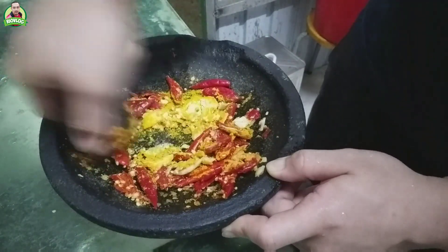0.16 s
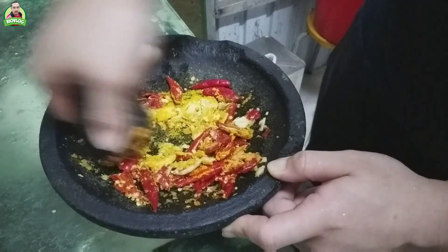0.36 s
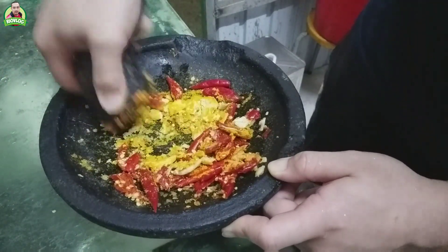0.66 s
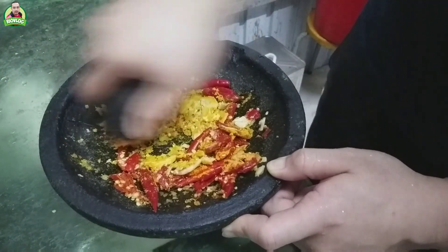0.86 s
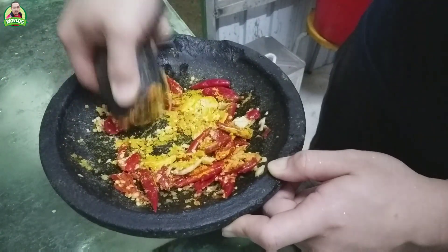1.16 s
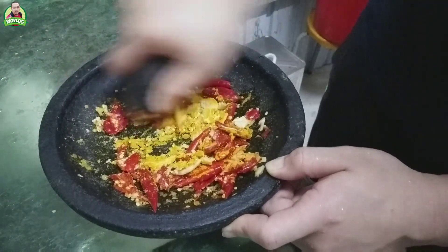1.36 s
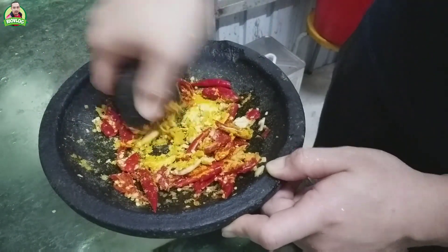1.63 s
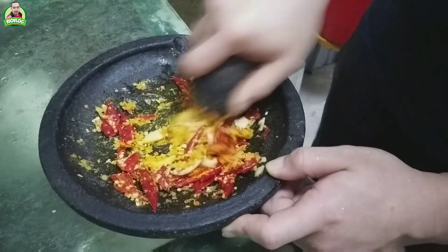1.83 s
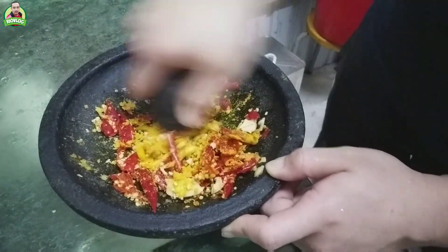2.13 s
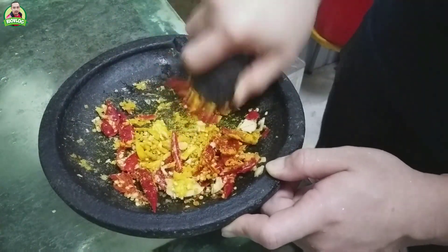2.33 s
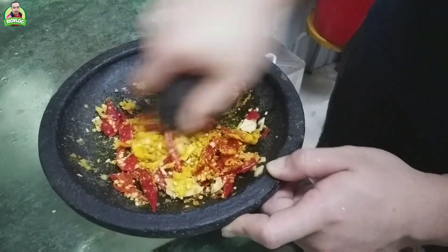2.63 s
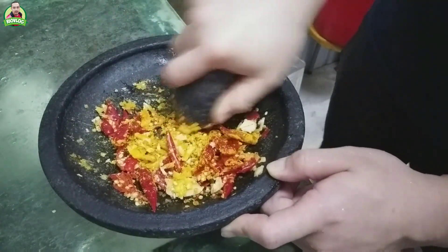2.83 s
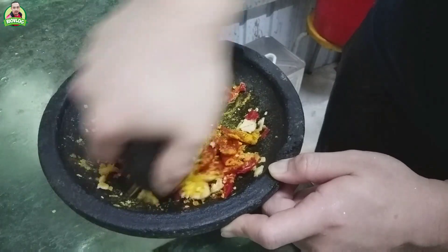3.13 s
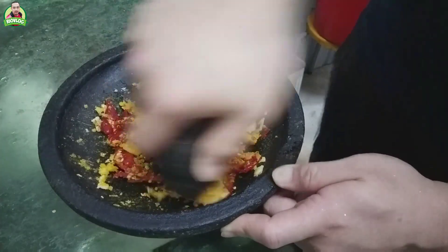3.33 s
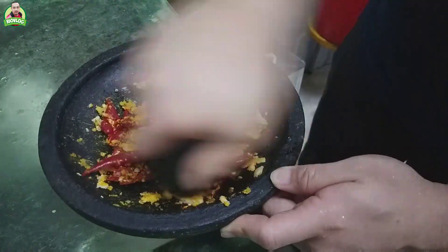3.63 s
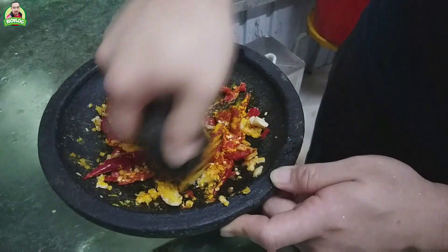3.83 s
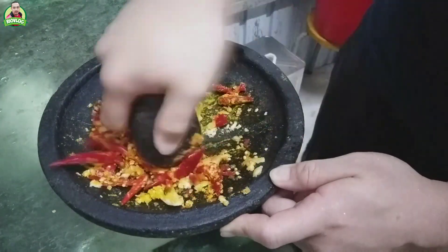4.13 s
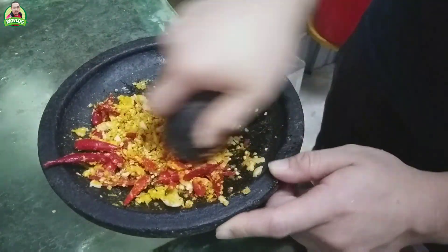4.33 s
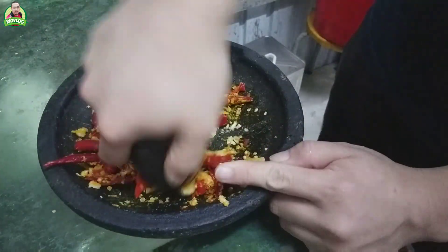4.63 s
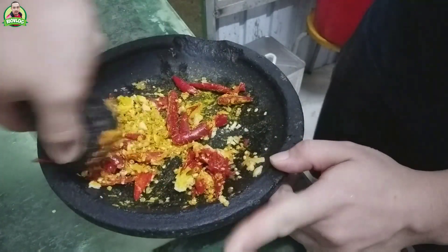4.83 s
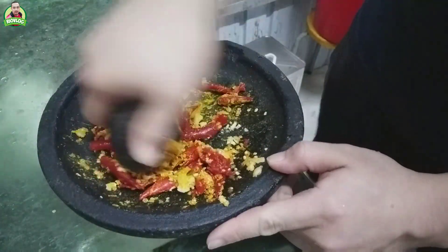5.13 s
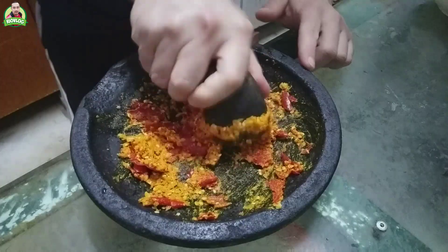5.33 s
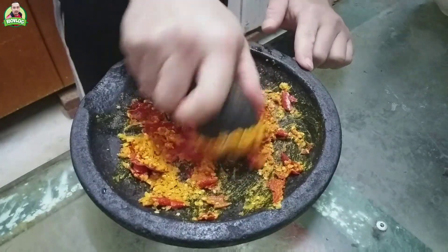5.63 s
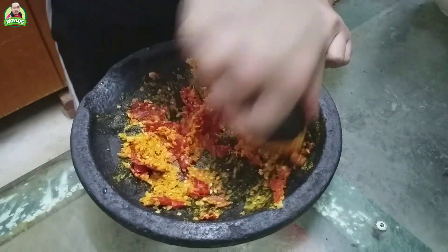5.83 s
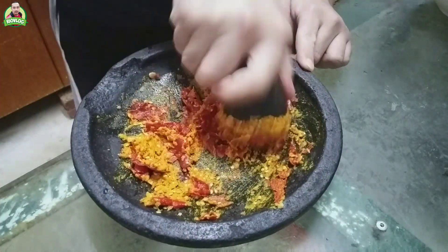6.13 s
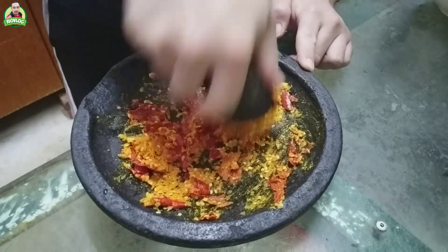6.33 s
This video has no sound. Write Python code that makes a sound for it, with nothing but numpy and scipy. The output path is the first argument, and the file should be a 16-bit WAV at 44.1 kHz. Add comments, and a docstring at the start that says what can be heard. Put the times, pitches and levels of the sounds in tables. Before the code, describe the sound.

Close by in a small tiled kitchen, a stone pestle grinds spices in a heavy stone mortar. A hard double knock at about 0.2 seconds rings the bowl around a middle pitch and thumps its base. Gentle, rumbling strokes follow, with gritty crackle, faint taps and tiny squeaks near 0.5 and 1.1. Around 1.9 to 2.2 a dense burst of seeds snaps sharply, with more at 2.45. Three quick stony scrapes come at 2.6, a duller thud at 3.1, and a rough, rumbling cluster at 3.5. Loud ringing knocks strike at 4.05, with a quick rebound, and at 4.6. Grinding quietens towards 5.3. At 5.36 the sound drops out for about a hundredth of a second, then grinding resumes brighter and closer, in short, low-bodied strokes, until 6.5. Short hard reflections follow the blows; faint kitchen air and thin steady tones lie underneath.

```python
"""A stone pestle in a flat stone mortar on a hard kitchen floor, heard from close by in a small tiled room.
A hard double knock rings the bowl; light taps, rumbling strokes and a burst of snapping seeds at 2 s follow.
Harder knocks come near 3.1, 4.05 and 4.6 s; the sound drops out near 5.36 s, then brighter, closer grinding ends it.
Blows and scrapes ring sets of dying modes, strokes drive random grit, snaps and squeaks are short noises.
Sparse reflections make the room; shaped noise and faint tones make the kitchen air."""
import sys
import numpy as np
from scipy import signal
from scipy.fft import rfft, irfft
from scipy.io import wavfile
from scipy.ndimage import uniform_filter1d

SR = 44100
rng = np.random.default_rng(int(sys.argv[2]) if len(sys.argv) > 2 else 0)


def bounce(signal):
    """Save signal as a 16-bit WAV file at the path given by the first command-line argument."""
    frames = np.transpose(np.atleast_2d(signal))
    limited = np.clip(frames, -1, 1)
    pcm = np.round(limited * 32767).astype(np.int16)
    wavfile.write(sys.argv[1], SR, pcm)


N = 285768
TIME = np.arange(N) / SR  # s
FLOOR_HZ = 120  # the deepest note of the floor under the mortar
# The short silence. Its start and its end in seconds.
GAP = (5.354, 5.366)


# Blows and rebounds of the pestle, and short stony scrapes near 2.6 s. Each row: start in seconds, bowl ring in
# dB, pitch favoured by the contact spot in Hz, floor thump in dB, thump pitch in Hz, base knock in dB, crack in
# dB, chatter's 60 dB decay in seconds, damping of the bowl as a factor on its decay rate.
BLOWS = [(0.186, -5, 1660, -13.5, 217, -4.5, -15.5, 0.12, 3.1),
         (0.2092, -6, 1600, -24, 166, -23, -25, 0.11, 1.3),
         (0.4767, -44, 1820, -29, 219, -30, -49.5, 0.035, 1.2),
         (1.0435, -50, 1590, -40, 170, -36, -34.5, 0.027, 1.4),
         (1.3152, -59, 1580, -22, 132, -50, -42.5, 0.14, 1.4),
         (1.548, -46, 1600, -42, 186, -32, -43, 0.082, 1.4),
         (2.1152, -42, 1700, -34, 216, -36, -30, 0.017, 1.4),
         (2.602, -32.5, 1500, -35, 240, -51, -51, 0.065, 2.2),
         (2.6312, -30, 1920, -29, 266, -29, -36, 0.067, 2.8),
         (2.659, -29, 1780, -35, 257, -26.5, -40, 0.09, 2.2),
         (2.8, -50, 1600, -32.5, 201, -44, -46, 0.04, 1.9),
         (3.1245, -31, 1560, -13.5, 196, -9, -20, 0.096, 1.8),
         (3.4732, -33, 1820, -22, 228, -19.5, -37, 0.14, 3.1),
         (3.5367, -27, 1660, -42, 145, -17.5, -38, 0.065, 1.5),
         (3.5459, -21.5, 1820, -19, 130, -35, -27, 0.055, 2.5),
         (3.5767, -37, 1610, -26, 255, -24, -35, 0.082, 2),
         (4.0506, -3.5, 1667, -17, 267, -13.5, -17.5, 0.29, 3.2),
         (4.0788, -12, 1590, -18, 265, -10.5, -20, 0.04, 2.1),
         (4.586, -7.5, 1690, -20.5, 257, -7, -12.5, 0.056, 2.92),
         (5.8948, -59, 1604, -30, 125, -47, -52, 0.17, 1.4)]
# Modes of the stone bowl. Each row: pitch in Hz, relative level in dB, undamped 60 dB decay in seconds.
BOWL_MODES = [(1485, -5, .05), (1540, -6, .06), (1602, -1, .085), (1630, -2, .075), (1760, -5, .045),
              (1890, -7, .04), (2050, -10, .03), (2300, -11, .03), (2600, -13, .025), (3135, -15, .04),
              (3310, -16, .04)]
# Modes of the mortar's base. Each row: pitch in Hz, relative level in dB, undamped 60 dB decay in seconds.
BASE_MODES = [(251.2, -1, 0.11), (350, -4.5, 0.14), (407.2, 2.5, 0.074), (474, -1.5, 0.087),
              (532.5, 5, 0.044), (638, -5, 0.086), (700, -7.5, 0.065), (819, -5.5, 0.042), (910, -9, 0.034),
              (1022, -14.5, 0.13), (1119, -21, 0.26), (1393, -15.5, 0.019)]
# Spectrum of the crack at contact. Each row: frequency in Hz, relative level in dB.
CRACK_SPECTRUM = [(300, -20), (700, 8.5), (1500, 1.5), (2600, -3), (4000, -7), (5500, -12), (7600, -16),
                  (9600, -36.5), (16000, -53.5)]


def blows():
    """Each blow or scrape is a push and a dying chatter; base and floor answer just after the bowl rings."""
    out = np.zeros(N)
    t = np.arange(SR // 3) / SR
    base = ringing(BASE_MODES)
    crack = colour(CRACK_SPECTRUM)
    bowl_hz = np.array(BOWL_MODES)[:, :1]
    for s, ring_db, spot_hz, thump_db, thump_hz, knock_db, crack_db, t60, damping in BLOWS:
        chatter, splinter = gain_of(-60 * t / t60) * rng.standard_normal((2, len(t)))
        drive = gain_of(-32) * chatter  # the pestle's rattle, against a push of 1
        drive[0] += 1
        # modes near the spot's own pitch speak louder
        spot_db = 6 * np.exp(-((bowl_hz - spot_hz) / 120) ** 2)
        bowl = ringing(BOWL_MODES, damping, spot_db)
        floor = ringing([(thump_hz, 0, .1), (FLOOR_HZ, -5, .14), (1.37 * thump_hz, -6, .08)])
        splinter = splinter * (1 + 0.19 * np.exp(-t / 0.00043))  # slightly stronger at first contact
        add(out, s, gain_of(ring_db) * through(drive, bowl / bowl.max()))
        add(out, s + 0.002764, gain_of(knock_db) * through(drive, base / base.max()))
        add(out, s + 0.00343, gain_of(thump_db) * through(drive, floor / floor.max()))
        add(out, s, gain_of(crack_db) * through(splinter, crack))
    return out


# Grinding strokes. Each row: peak in seconds, rise in seconds, fall in seconds (both before the layer's fade
# speed), then peak levels in dB of floor thrum, base rumble, stone on stone, spice crackle.
STROKES = [(0.01, .15, 0.13, -47.5, -44.5, -48.5, -47), (0.319, 0.15, 0.1, -36, -43, -50, -37),
           (0.479, 0.0155, 0.19, -42.5, -39.5, -48, -52), (0.58, 0.16, 0.094, -55, -47, -50.5, -42.5),
           (0.81, 0.088, 0.105, -62, -74, -70, -46), (0.94, 0.11, 0.07, -42, -46.5, -52, -37),
           (1.041, 0.032, 0.17, -48.5, -45.5, -53, -48.5), (1.325, 0.0067, 0.032, -33.5, -45, -55, -42.5),
           (1.427, 0.095, 0.09, -40.5, -49, -46.5, -36.5), (1.585, .08, 0.16, -46.5, -45.5, -48, -40),
           (1.67, 0.11, 0.26, -51.5, -49.5, -49.5, -42), (1.904, 0.05, 0.12, -61, -55, -44.5, -33.5),
           (1.983, 0.06, .06, -42, -49, -46, -34), (2.084, 0.026, 0.069, -42, -57, -42, -27),
           (2.13, 0.042, 0.13, -41, -40, -54, -45), (2.19, 0.068, 0.076, -53, -49.5, -47, -31.5),
           (2.441, 0.089, .11, -39, -42.5, -41, -30), (2.611, 0.096, 0.18, -47, -39.5, -40.5, -41),
           (2.688, 0.087, 0.21, -39.5, -41, -46.5, -34), (2.945, 0.042, 0.098, -43, -47, -46.5, -43.5),
           (3.215, 0.11, .17, -39, -40.5, -42.5, -39.5), (3.478, 0.029, 0.031, -36, -38, -44, -40.5),
           (3.561, 0.032, 0.098, -26.5, -27, -38, -33), (3.74, 0.1, 0.14, -41.5, -41, -48.5, -37.5),
           (3.86, .1, 0.035, -43, -54, -63, -40.5), (4.16, 0.11, 0.053, -59, -32, -52, -33.5),
           (4.278, 0.15, 0.091, -48, -46.5, -54, -40), (4.685, 0.065, 0.099, -34.5, -40.5, -39.5, -40),
           (5.019, 0.05, 0.18, -47, -52, -54, -41.5), (5.371, 0.019, 0.093, -49, -47.5, -45, -39.5),
           (5.47, 0.081, 0.17, -43, -50, -46, -43.5), (5.535, 0.11, 0.12, -60, -48, -43, -48),
           (5.638, 0.046, 0.19, -40, -45.5, -50.5, -42.5), (5.77, .12, 0.062, -38.5, -49, -62, -47),
           (5.907, 0.02, 0.068, -27.5, -55.5, -48, -39.5), (5.98, 0.18, 0.1, -56, -45, -41, -46.5),
           (6.048, 0.11, 0.071, -38.5, -48.5, -51, -38), (6.187, 0.039, .09, -39, -68, -61, -37),
           (6.288, 0.1, 0.084, -38.5, -42.5, -49, -42), (6.462, 0.022, .1, -58, -48, -60, -41)]
# Levels between strokes, before leaning. In order: thrum, rumble, rasp, crackle, all in dB.
RESTING_DB = (-68, -61.5, -59, -78)
# Weight left on the pestle between strokes. Each row: time in seconds, dB added to the resting levels.
LEANING = [(0, 10), (.6, -1), (1.3, 0), (1.5, 9), (4.0, 9), (4.4, 1), (5.35, -6), (5.4, 4), (6.48, 8)]
# How fast each layer leaves a stroke's peak. In order: thrum, rumble, rasp, crackle, all as plain factors.
FADE_SPEED = (1.28, 1.16, .99, 1.29)


def stroke_levels():
    """Every stroke swells to its peak and fades; overlapping strokes add in power. Four levels in dB."""
    t = np.arange(0, N + 64, 64) / SR
    leaning_db = np.interp(t, *np.transpose(LEANING))
    power = gain_of(np.add.outer(RESTING_DB, leaning_db)) ** 2
    for peak, rise, fall, *level_db in STROKES:
        away = np.maximum((peak - t) / rise, (t - peak) / fall)
        away = away ** 1.15  # above 1 a stroke lingers near its peak and stops more suddenly
        drop_db = 15 * np.outer(FADE_SPEED, away)
        power = power + gain_of(np.array(level_db)[:, None] - drop_db) ** 2
    return (np.interp(TIME, t, 10 * np.log10(p)) for p in power)


# Stone rasping on stone. Each row: frequency in Hz, relative level in dB.
RASP_SPECTRUM = [(300, -25.5), (700, 21.5), (1200, 17), (2000, 12.5), (3200, 10.5), (5000, -7.5)]
# Added brighter rasp from the gap on, heard closer. Each row: frequency in Hz, relative level in dB.
CLOSE_RASP_SPECTRUM = [(1200, -17), (2200, -5.5), (3200, -0.5), (4500, -1), (7000, -28.5)]
# Breaking spice, shared with the snaps. Each row: frequency in Hz, relative level in dB.
CRACKLE_SPECTRUM = [(880, -57), (1500, -26), (1940, -18), (2230, -22), (2560, -15.5), (3000, -12.5),
                    (4160, -7), (5770, -8), (7610, -3.5), (9650, -24), (14300, -24), (16000, -26)]


def grinding():
    """Under the stroke grit shakes floor and base, rasps on the hand-damped bowl and crackles."""
    thrum_db, rumble_db, rasp_db, crackle_db = stroke_levels()
    bumps = evened(grit(300, 1.5, 1.2))

    # the floor note climbs 3.5 Hz per dB as the base is pressed harder
    thrum_hz = 184.6 + 3.5 * np.clip(rumble_db + 45.5, -12, 12)
    climbing = evened(resonate(resonate(bumps, thrum_hz, width_hz=123), thrum_hz, width_hz=113))
    deepest = evened(resonate(resonate(bumps, FLOOR_HZ, width_hz=48), FLOOR_HZ, width_hz=40))
    thrum = gain_of(thrum_db) * (climbing + gain_of(-6.0) * deepest)
    rumble = through(gain_of(rumble_db) * bumps, ringing(BASE_MODES, damping=1.84))

    stone = gain_of(rasp_db) * grit(400, 1.9, 0.91)
    rasp = gain_of(-5.0) * through(stone, colour(RASP_SPECTRUM))
    rasp = rasp + gain_of(-20.0) * through(stone, ringing(BOWL_MODES, damping=1.5))
    rasp = rasp + gain_of(-10.5) * (TIME > GAP[0]) * through(stone, colour(CLOSE_RASP_SPECTRUM))

    # grains break in clusters
    clumps = gain_of(1.8 * evened(uniform_filter1d(rng.standard_normal(N), 400)))
    grains = gain_of(crackle_db) * evened(clumps * grit(1200, 2.6, .9))
    # light strokes break only fine grains and sound thinner
    coarse = np.clip((crackle_db + 67.5) / 24, 0, 1)
    crackle = through(coarse * grains, colour(CRACKLE_SPECTRUM))
    crackle = crackle + through((1 - coarse) * grains, colour(tilted(CRACKLE_SPECTRUM, 7, 7000)))
    return thrum + rumble + rasp + crackle


# Seeds snapping, and a few short grinding clicks. Each row: start in seconds, level in dB, tilt below 7600 Hz
# in dB per octave.
SNAPS = [(0.2921, -9.5, 4), (0.817, -28, 17), (0.8615, -26, -2), (1.3945, -20.5, -7.5), (1.832, -24, 1),
         (1.91, -21, -8), (1.9622, -11, -4.5), (2.0746, -12.5, 0), (2.075, -5.5, -3), (2.098, -21, 5),
         (2.116, -9.5, 6), (2.149, -22, -9), (2.178, -13.5, 2.5), (2.426, -14, -3), (2.4407, -14.5, 0),
         (2.462, -12, 2), (2.592, -21, 27), (2.789, -24, 20), (2.955, -30.5, 24), (3.181, -23, 2),
         (3.264, -43, 16), (3.29, -32, 2), (3.45, -35, 14), (3.463, -37, 16), (3.5771, -13, -2.5),
         (3.651, -25, 15), (3.762, -28, 9), (3.806, -21, 1), (3.8513, -23, 10), (4.273, -31, 4),
         (5.047, -25.5, 16), (5.13, -28, 2), (5.477, -31, 8), (5.701, -27, -6), (5.898, -21.5, 19),
         (6.175, -20, 22), (6.245, -23, 0), (6.255, -21.5, -5), (6.452, -24.5, 5)]


def snaps():
    """Each snap or grinding click is a sharp click and a few milliseconds of splintering."""
    out = np.zeros(N)
    t = np.arange(2000) / SR
    for s, db, tilt_db in SNAPS:
        splinters = rng.standard_normal(len(t)) * np.exp(-(t / 0.0035) ** 3) / 3
        splinters[0] = 1.15  # the click
        shape = tilted(CRACKLE_SPECTRUM, tilt_db, 7600)
        add(out, s, gain_of(db) * through(splinters, colour(shape)))
    return out


# Grains squeaking on stone. Each row: start in seconds, level in dB before the swell and decay, pitch in Hz,
# length in seconds (the sound runs for three lengths as it dies).
SQUEAKS = [(0.535, -44, 3270, 0.027), (1.081, -46, 3164, 0.042), (2.787, -42, 3200, 0.062)]


def squeaks():
    """Short narrow chirps of noise that swell and die."""
    out = np.zeros(N)
    for s, db, hz, length in SQUEAKS:
        u = np.arange(round(3 * length * SR)) / SR / length  # time in lengths
        chirp = evened(resonate(rng.standard_normal(len(u)), hz, width_hz=54))
        add(out, s, gain_of(db) * chirp * np.tanh(8 * u) * np.exp(-1.5 * u))
    return out


# Kitchen air at the microphone. Each row: frequency in Hz, relative level in dB.
AIR_SPECTRUM = [(18, -52), (30, 7.5), (127, -6.5), (404, -10.5), (486, -12), (866, -7.5), (962, -12),
                (1160, -8.5), (1390, -14.5), (1960, -16.5), (2610, -24.5), (2980, -16), (7670, -18.5),
                (9460, -45), (16000, -50)]
# Faint steady tones. Each row: pitch in Hz, wander in Hz, level in dB, start in seconds, stop in seconds.
TONES = [(1163, 10, -67, 1.85, 5.36), (4900, 200, -70, 0, 5.36), (3550, 80, -70, 0, 5.36),
         (3600, 50, -65, 5.36, 6.5), (12300, 800, -68, 5.36, 6.5)]


def background():
    """Steady kitchen air with a few faint tones of even strength and wandering pitch."""
    hz = np.fft.rfftfreq(N, 1 / SR)
    air = irfft(rfft(rng.standard_normal(N)) * gain_of(read(AIR_SPECTRUM, hz)), N)
    out = gain_of(-51) * evened(air)
    for tone_hz, wander_hz, db, start, stop in TONES:
        band = irfft(rfft(rng.standard_normal(N)) * np.exp(-((hz - tone_hz) / wander_hz) ** 2), N)
        steady = evened(band / abs(signal.hilbert(band)))  # divided by its own envelope
        out += gain_of(db) * steady * (TIME > start) * (TIME < stop)
    return out


# Decay of the small tiled room. Each row: frequency in Hz, 60 dB decay in seconds.
ROOM_DECAY = [(100, 0.18), (260, 0.25), (700, 0.33), (1800, 0.33), (5000, 0.46), (12000, 0.31)]


def room(x):
    """Sparse reflections of random sign, each band dying at its own speed."""
    taps = np.zeros(SR // 2)
    at = np.arange(200, len(taps) - 20, 20)
    taps[at + rng.integers(0, 20, len(at))] = rng.choice([-1., 1.], len(at))
    hz, t, z = signal.stft(taps, SR, nperseg=256)
    decay = gain_of(-60 * t / read(ROOM_DECAY, hz)[:, None])
    tail = signal.istft(z * decay, SR, nperseg=256)[1]
    return through(x, tail / np.linalg.norm(tail))


def gain_of(db):
    """Decibels to gain."""
    return 10 ** (np.asarray(db) / 20)


def evened(x):
    """Scales to rms 1."""
    return x / np.sqrt(np.mean(x ** 2) + 1e-20)


def read(points, hz):
    """Reads a table of values on a log-frequency axis."""
    f, value = np.transpose(points)
    return np.interp(np.log(hz + 1), np.log(f + 1), value)


def tilted(points, db_per_octave, below_hz):
    """Tilts a spectrum below a frequency; a positive tilt thins the lows."""
    return [(f, level + db_per_octave * np.log2(min(f, below_hz) / below_hz)) for f, level in points]


def add(mix, s, sound):
    """Mixes a sound in at a time in seconds."""
    part = mix[round(s * SR):][:len(sound)]
    part += sound[:len(part)]


def colour(points):
    """Causal (minimum-phase) impulse response with the given spectrum, energy 1."""
    db = np.maximum(read(points, abs(np.fft.fftfreq(4096, 1 / SR))), -100)
    log_gain = np.log(gain_of(db))
    phase = -signal.hilbert(log_gain).imag
    taps = np.fft.ifft(np.exp(log_gain + 1j * phase)).real[:2048]
    return taps / np.linalg.norm(taps)


def ringing(modes, damping=1, spot_db=0):
    """Impulse response of a set of dying modes, energy 1; spot_db is how well the contact reaches each mode."""
    hz, db, t60 = np.transpose(modes)[:, :, None]
    t = np.arange(SR // 4) / SR
    sign = (-1) ** np.arange(len(hz))[:, None]
    strength = sign * gain_of(db + spot_db - 60 * damping * t / t60)
    taps = (strength * np.sin(2 * np.pi * hz * t)).sum(0)
    return taps / np.linalg.norm(taps)


def through(x, taps):
    """Filters a sound."""
    return signal.oaconvolve(x, taps)[:len(x)]


def grit(per_s, spread_db, dense):
    """Random clicks of uneven size over a bed of fine noise."""
    size = gain_of(spread_db * np.minimum(rng.exponential(1, N), 4)) * rng.choice([-1., 1.], N)
    clicks = size * (rng.random(N) < per_s / SR)
    return evened(clicks) + dense * rng.standard_normal(N)


def resonate(x, hz, width_hz):
    """Shifts the curve hz down to zero, smooths, and shifts back: a moving resonance."""
    turn = np.exp(2j * np.pi * np.cumsum(hz * np.ones(len(x))) / SR)
    r = np.exp(-np.pi * width_hz / SR)
    return 2 * (turn * signal.lfilter([1 - r], [1, -r], x / turn)).real


def scene():
    """The mortar, its echo and the kitchen; from the gap on, the rubbed sounds' highest treble is duller."""
    struck = blows()
    rubbed = snaps() + squeaks() + grinding()
    top = signal.oaconvolve(rubbed, signal.firwin(101, 9400, pass_zero=False, fs=SR), "same")
    rubbed = rubbed - .5 * top * (TIME > GAP[0])
    echo = room(gain_of(-3.5) * struck + gain_of(-11.0) * rubbed)
    return (struck + rubbed + echo + background())[None]


def record(dry):
    """Bass roll-off, soft overload on the hardest blows, the brief silence, then the band limit."""
    thin = signal.sosfilt(signal.butter(4, 80, "high", fs=SR, output="sos"), dry)
    loud = 1.4 * np.tanh(thin / 1.4)
    # 0.36 ms ramps on both sides of the silence
    gapped = loud * np.clip(np.maximum(GAP[0] - TIME, TIME - GAP[1]) / 0.00036, 0, 1)
    band_limit = signal.firwin(511, 15550, window=("kaiser", 9), fs=SR)
    return signal.oaconvolve(gapped, band_limit[None], "same")


dry = scene()
out = record(dry)
bounce(out)
```